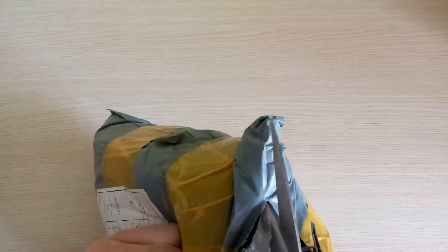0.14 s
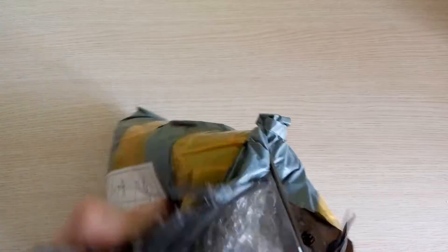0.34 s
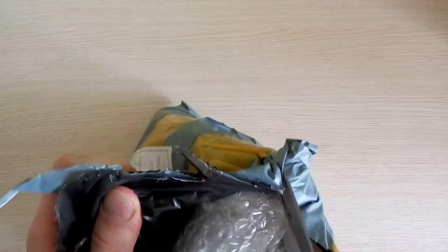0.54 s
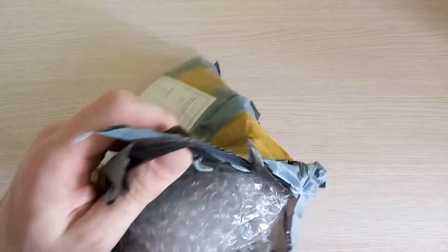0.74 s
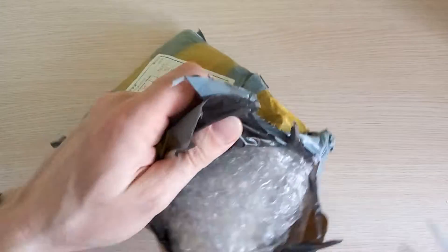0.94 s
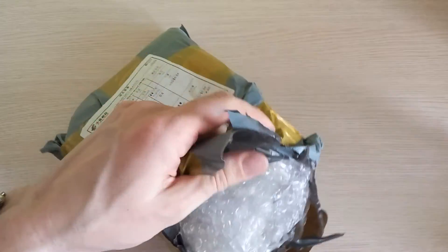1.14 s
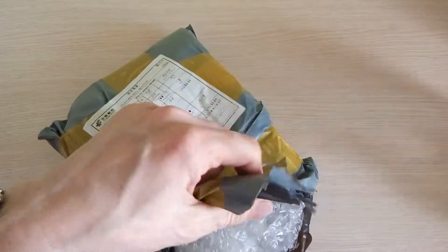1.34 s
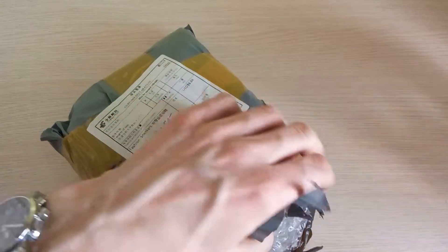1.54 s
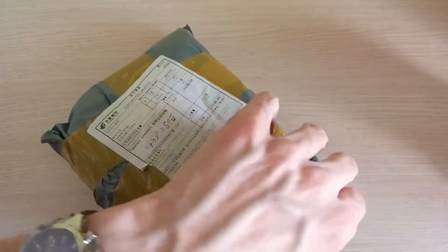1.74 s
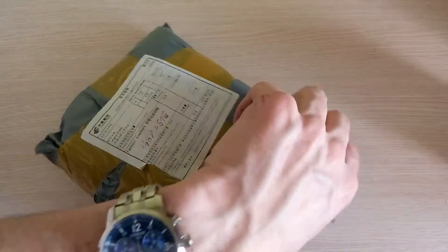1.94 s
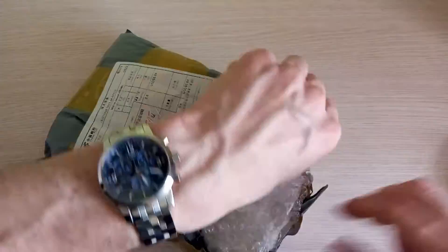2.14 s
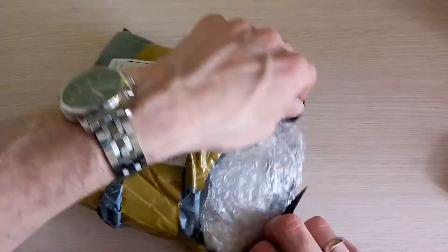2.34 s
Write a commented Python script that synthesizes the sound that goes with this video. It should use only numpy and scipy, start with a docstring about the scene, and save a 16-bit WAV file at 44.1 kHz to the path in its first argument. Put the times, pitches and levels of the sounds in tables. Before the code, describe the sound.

A taped plastic mailer bag rustles and crackles under hands, with dense crisp creases snapping until about 0.7 s. A thin film hiss and sparse crinkles fade toward 1 s. Light knocks and short gritty slides on the wooden table run from 1.2 to 1.8 s, then harder knocks, loudest near 2 s, bounce until 2.35 s amid soft rustle. Close, small room, faint low rumble.

```python
"""Hands pull at a taped plastic mailer bag on a wooden table in a small room, a phone above it.
From the start dense clicks make the film rustle and pitched bursts make its creases snap, while hands press
on the ringing board over a faint rumble; a thin hiss of stretched film follows.
From the middle on hard knocks and bounces, clatter plus pushes on the board's modes, hit the table top,
and something slides over it: fine friction grain through narrow resonances."""
import sys
import numpy as np
from scipy import signal
from scipy.fft import rfft, irfft
from scipy.io import wavfile
from scipy.ndimage import uniform_filter1d, map_coordinates

SR = 44100
rng = np.random.default_rng(int(sys.argv[2]) if len(sys.argv) > 2 else 0)


def bounce(signal):
    """Save signal as a 16-bit WAV file at the path given by the first command-line argument."""
    frames = np.transpose(np.atleast_2d(signal))
    limited = np.clip(frames, -1, 1)
    pcm = np.round(limited * 32767).astype(np.int16)
    wavfile.write(sys.argv[1], SR, pcm)


def voltage_ratio(level):
    """Linear amplitude factor for a level in decibels (scalar or array-like)."""
    return 10 ** (np.asarray(level, float) / 20)


N = 110250


def unit(x):
    """Scale to rms 1."""
    return x / np.sqrt(np.mean(x ** 2))


def curve(rows, col=1):
    """Gain along a dB column over time in s; -120 dB outside the table."""
    rows = np.array(rows)
    return voltage_ratio(np.interp(np.arange(N) / SR, rows[:, 0], rows[:, col], left=-120, right=-120))


def colour(x, points):
    """Causal minimum-phase filter with the given (Hz, dB) shape, power gain 1."""
    hz, db = np.array(points).T
    grid_hz = np.arange(1025) * SR / 2048
    log_gain = np.interp(np.log(grid_hz + 1), np.log(hz), db) * np.log(10) / 20
    # folding the cepstrum onto positive time makes the filter causal
    cepstrum = irfft(log_gain)
    cepstrum[1:1024] *= 2
    cepstrum[1025:] = 0
    h = irfft(np.exp(rfft(cepstrum)))[:768]
    return signal.fftconvolve(x, h / np.sqrt(np.sum(h ** 2)))[:N]


def halves(low, high):
    """Bass of one signal plus treble of another, split at 2250 Hz."""
    def cut(x, kind):
        return signal.sosfilt(signal.butter(2, 2250, kind, fs=SR, output="sos"), x)
    # the two second-order halves oppose in phase at the split, hence the minus
    return cut(low, "low") - cut(high, "high")


def ring(x, hz, width_hz):
    """Resonance, gain 1 at the centre."""
    return signal.lfilter(*signal.iirpeak(hz, hz / width_hz, fs=SR), x)


def decay(x, fade_ms):
    """Exponential tail with the given time constant after every impulse."""
    return signal.lfilter([1], [1, -np.exp(-1000 / (fade_ms * SR))], x)


def clicks(per_s, spread_db):
    """Random clicks, many small and few large, each with a short noisy tail; rms 1."""
    chance, sign, size = rng.random((3, N))
    soft_gate = 1 / (1 + np.exp(np.minimum((chance * SR / per_s - 1) * 8, 50)))
    sizes = soft_gate * voltage_ratio(np.minimum(-spread_db * np.log(size + 1e-9), 20))
    level = decay(sizes ** 2, 0.24) ** .5  # the power, not the amplitude, fades over 0.24 ms
    return unit(np.sign(sign - .5) * level)


def walk(rate):
    """Random levels held 1 / rate s and slewed twice; spread near 1."""
    k = int(SR / rate)
    held = np.repeat(rng.standard_normal(N // 50), k)[:N]
    return 1.5 * uniform_filter1d(uniform_filter1d(held, k), k)


def burst(s, db, hold_ms, fade_ms):
    """Envelope: rise over 0.1 ms, hold, exponential fade."""
    ms = (np.arange(N) / SR - s) * 1000
    return voltage_ratio(db) * np.clip(ms * 10, 0, 1) * np.exp(-np.clip(ms - hold_ms, 0, 500) / fade_ms)


def bag():
    """Dense small clicks rustle in bands that crackle each on their own; creases snap at a pitch."""
    # Rustle of the film ahead of its colour: start_s, level_db, bass_db (below the split, relative)
    rustle = [(0, -29, -17), (.05, -57, 5.5), (.1, -41, -6.5), (.3, -47.5, -1), (.39, -48.5, -11),
              (.43, -37.5, -6), (.48, -30, -17), (.53, -40, -18), (.6, -47.5, -6.5), (.65, -39.5, -10),
              (.88, -42, -5), (.95, -45, -19), (1.2, -44, -16), (1.42, -55.5, 5), (1.88, -51, -12.5),
              (1.94, -46, 0), (2.21, -38, 4.5), (2.27, -48, 2), (2.33, -41, -15), (2.5, -40.5, -5)]
    # Creases that snap, ahead of the film colour: start_s, level_db, pitch_hz
    creases = [(0.012, -26, 5100), (0.0654, -24.5, 6200), (0.082, -25.5, 2400), (0.0909, -24.5, 4330),
               (0.109, -41, 6300), (0.1228, -15.5, 6150), (0.138, -34, 600), (0.175, -21, 5900),
               (0.192, -25, 6500), (0.2031, -29.5, 1620), (0.229, -26.5, 3670), (0.2407, -25.5, 4900),
               (0.275, -24.5, 6530), (0.2855, -22.5, 5500), (0.3254, -25, 4260), (0.347, -31.5, 1260),
               (0.412, -22.5, 6340), (0.469, -31, 3340), (0.4899, -15.5, 5560), (0.517, -22.5, 3620),
               (0.528, -29, 1400), (0.5513, -18, 6000), (0.626, -19.5, 6300), (0.6335, -25, 1236),
               (0.67, -23.5, 3480), (0.9733, -37, 1300), (1.0117, -30, 1770), (1.1135, -24, 6000),
               (1.1465, -34.5, 1290), (2.425, -32, 1030)]
    # Tone of the film: frequency_hz, level_db
    film_tone = [(100, -5), (350, 6.5), (1200, 3.5), (2600, -3.5), (5000, -1), (6500, 1.5), (8000, -6.5),
                 (11000, -17.5), (16000, -20.5)]
    fade_ms = 3.67  # of crackles and snaps alike

    def crackle():
        """Steady gain 1 plus about 90 fading jumps per second."""
        jumps = (rng.random(N) < 90 / SR) * voltage_ratio(6.5 + 3.5 * rng.standard_normal(N))
        return 1 + decay(jumps, fade_ms)

    hands = curve(rustle) * voltage_ratio(1.13 * walk(90))
    grain = clicks(per_s=9000, spread_db=1.5)
    bands = [ring(grain, hz, hz) * crackle() for hz in np.geomspace(400, 12000, num=5)]
    bright = unit(sum(bands)) * hands
    film = halves(bright * curve(rustle, col=2), bright)
    large = clicks(per_s=6900, spread_db=3)
    wide = halves(0.18 * large, large)
    for s, db, hz in creases:
        pitched = unit(ring(large, hz, hz / 2.97))
        film = film + burst(s, db, 0, fade_ms) * (pitched * 0.39 + wide * .55)
    return colour(film, film_tone)


def board(force):
    """Decaying modes of the table top, driven by a force; their levels waver."""
    # Modes of the wooden board: frequency_hz, level_db, t60_s
    modes = [(73, -18.5, 1), (125.1, -7.5, 0.27), (171.3, 9, 0.096), (194.6, 13.5, 0.041),
             (360.5, -4, 0.14), (485, 3, 0.027), (601.2, 3.5, 0.1), (939, 7, 0.083), (1062, -19, 0.32),
             (1300, 1, 0.15), (262.3, 4.5, 0.045)]
    out = 0
    for k, (hz, db, t60) in enumerate(modes):
        pole = np.exp(2j * np.pi * hz / SR - np.log(1000) / (t60 * SR))
        level = voltage_ratio(db + 1.14 * walk(29.8))
        out = out + (-1) ** k * level * signal.lfilter([1], [1, -pole], force).imag
    return out


def press():
    """Hands and bag press on the board: soft noise below 300 Hz shakes its modes."""
    # Pressure heard through the board: start_s, level_db
    pressure = [(0, -63), (.09, -51.5), (.25, -83), (.5, -52), (.6, -63), (.7, -49), (1, -79), (1.35, -45),
                (1.6, -61.5), (2.2, -41.5), (2.5, -52)]
    soft = signal.sosfilt(signal.butter(2, 300, fs=SR, output="sos"), rng.standard_normal(N))
    return unit(board(soft * voltage_ratio(3.5 * walk(30.52)))) * curve(pressure)


def rumble():
    """Faint steady noise through one broad low resonance."""
    return unit(ring(rng.standard_normal(N), 73, 73)) * voltage_ratio(-68.5)


def room(x):
    """Diffuse tail that fades faster in the treble."""
    # Decay of the small room: frequency_hz, t60_s
    decays = [(400, 0.45), (2000, 0.35), (8000, 0.17)]
    tail_db = -12
    t = np.arange(SR // 2) / SR
    tail = sum(ring(rng.standard_normal(len(t)), hz, 1.34 * hz) * voltage_ratio(-60 * t / t60) for hz, t60 in decays)
    tail = tail * np.clip(t / 0.0019 - .6, 0, 1)  # silent for the first 1.1 ms, full after 3 ms
    return x + voltage_ratio(tail_db) * signal.fftconvolve(x, tail / np.sqrt(np.sum(tail ** 2)))[:N]


def stretch():
    """Thin hiss of stretched film: uneven clicks through one resonance."""
    # Hiss: start_s, level_db
    hiss = [(.62, -52), (.71, -41.5), (.97, -50)]
    return unit(ring(clicks(per_s=11000, spread_db=9.2), 6600, 800)) * curve(hiss)


def knocks():
    """Each knock is a short clatter of hard contacts and a push on the board."""
    # Knocks on the table, ahead of clatter colour and board modes:
    # start_s, clatter_db, board_db, treble_db (clatter above the split, relative)
    hits = [(1.236, -28, -59, -12), (1.267, -29, -43.5, -4.5), (1.359, -32.5, -45, -4),
            (1.672, -52, -46, -7), (1.809, -20, -37.5, 1), (1.977, -28, -29, 2), (1.986, -15, -27.5, -2.5),
            (1.997, -15, -52, -33), (2.102, -28.5, -40, 3), (2.149, -25.5, -32.5, -10),
            (2.157, -22, -41.5, -46), (2.197, -27, -36, -33), (2.243, -29.5, -36.5, -43),
            (2.34, -35.5, -44, -26)]
    # Tone of the clatter: frequency_hz, level_db
    clatter_tone = [(200, -7.5), (400, -3), (1000, 3), (2200, 1), (4500, -3), (6500, -3), (10500, -22.5),
                    (16000, -39)]
    hold_ms, fade_ms = 4, 5
    rattle_db = -41.5  # how much of the clatter's bass drives the board

    hard = clicks(per_s=8000, spread_db=2.5)
    early = (np.array(hits)[:, 0] * SR).astype(int) + 6
    hard[early] = voltage_ratio(-21)  # sets one sample near silence early in each knock
    low = sum(burst(s, db, hold_ms, fade_ms) for s, db, _, _ in hits)
    high = sum(burst(s, db + up_db, hold_ms, fade_ms) for s, db, _, up_db in hits)

    ms = np.arange(N) / SR * 1000
    push = 0
    for s, _, db, _ in hits:
        width_ms = 0.23 * voltage_ratio(-0.57 * (db + 29.5))  # the weaker the push, the longer
        push = push + voltage_ratio(db) / width_ms * np.exp(-((ms - s * 1000 - 1) / width_ms) ** 2)
    force = push / (SR / 1000) + hard * low * voltage_ratio(rattle_db)
    return colour(halves(hard * low, hard * high), clatter_tone) + board(force)


def slide():
    """Fine friction grain through narrow resonances of the thing that slides; each swells and drifts alone."""
    # Slide over the table: start_s, level_db, treble_db (above the split, relative)
    strokes = [(1.27, -40.5, -15), (1.32, -32.5, -35), (1.4, -40, -55), (1.46, -66, -22), (1.54, -37.5, -4),
               (1.585, -50.5, -19), (1.64, -42, 3.5), (1.73, -42.5, 4.5), (1.79, -50.5, -16)]
    # Resonances of the sliding thing ahead of the common level: frequency_hz, level_db
    peaks = [(1040, 2), (1850, 4.5), (2850, -1), (3650, -1), (4600, 2), (6100, 11), (7580, 3), (9300, -18),
             (11800, -24)]

    def drift(x):
        """Read the signal at a wandering speed so its pitch drifts."""
        return map_coordinates(x, [np.arange(N) + np.cumsum(0.03 * walk(15))], mode="mirror")

    grain = clicks(per_s=15000, spread_db=0.57) * voltage_ratio(2.4 * walk(48.7))
    bands = []
    for hz, db in peaks:
        swell = voltage_ratio(db + 2.0 * walk(30.04))
        narrow = ring(ring(grain, hz, .14 * hz), hz, .14 * hz)
        bands.append(swell * drift(unit(narrow)))
    bands[0] = bands[0] * voltage_ratio(-10 * (np.arange(N) < 1.45 * SR))  # the lowest is 10 dB down until 1.45 s
    broad = voltage_ratio(7.5) * unit(ring(grain, 4300, 4000))
    rub = unit(sum(bands) + broad) * curve(strokes)
    return halves(rub, rub * curve(strokes, col=2))


def scene():
    """Bag, pressing hands, knocks and slide in the room, over a faint low rumble."""
    return room(bag() + press() + rumble() + stretch() + knocks() + slide())[None]


def band_limit(x):
    """A steep low-pass at the top of the band."""
    return signal.sosfilt(signal.butter(12, 16650, fs=SR, output="sos"), x)


def record(dry):
    """The phone above the table cuts the lowest bass and the top."""
    x = signal.sosfilt(signal.butter(1, 60, "high", fs=SR, output="sos"), dry)
    x = signal.sosfilt(signal.ellip(8, .2, 40, 15800, fs=SR, output="sos"), x)
    return band_limit(x)


dry = scene()
out = record(dry)
bounce(out)
```